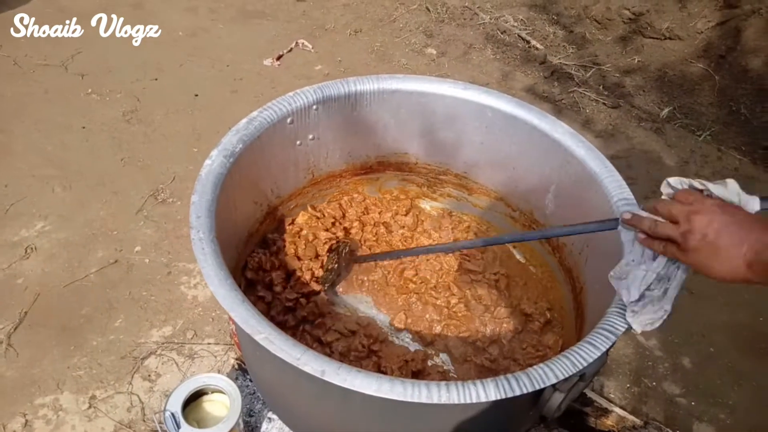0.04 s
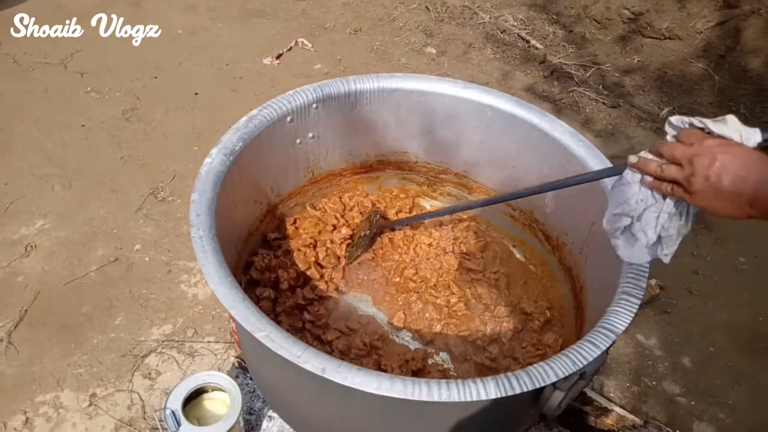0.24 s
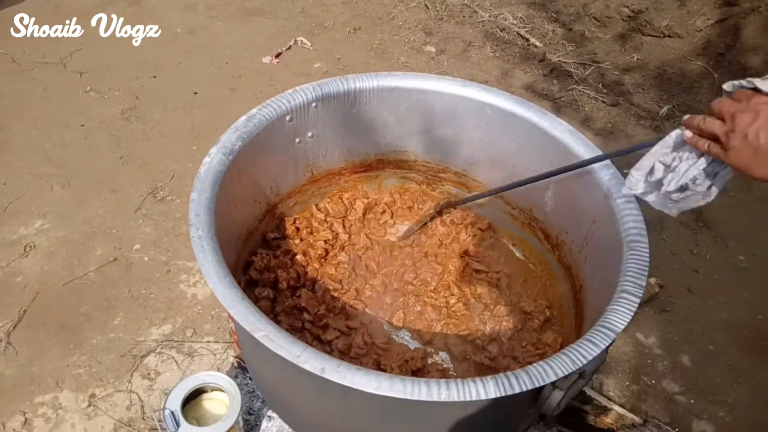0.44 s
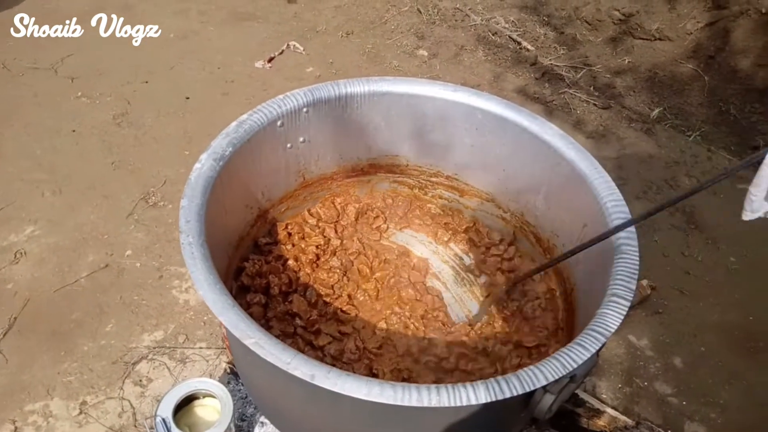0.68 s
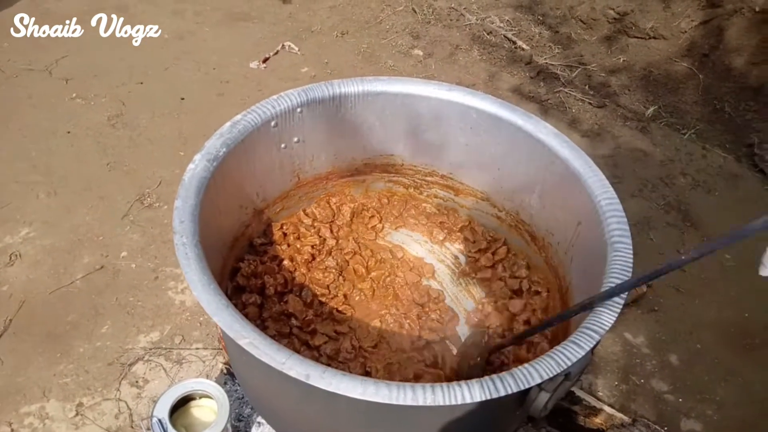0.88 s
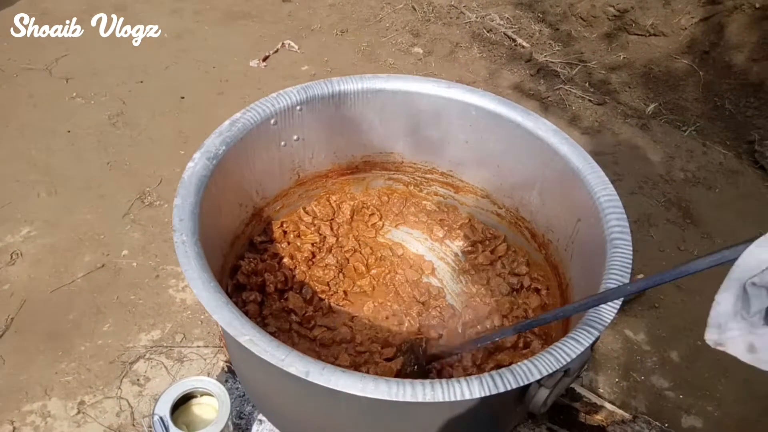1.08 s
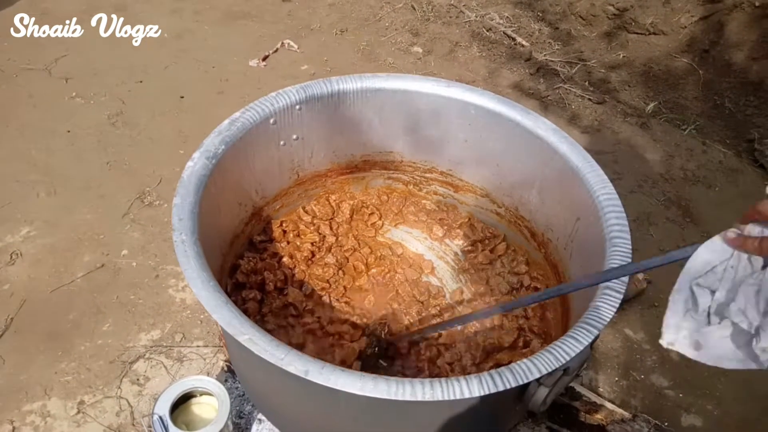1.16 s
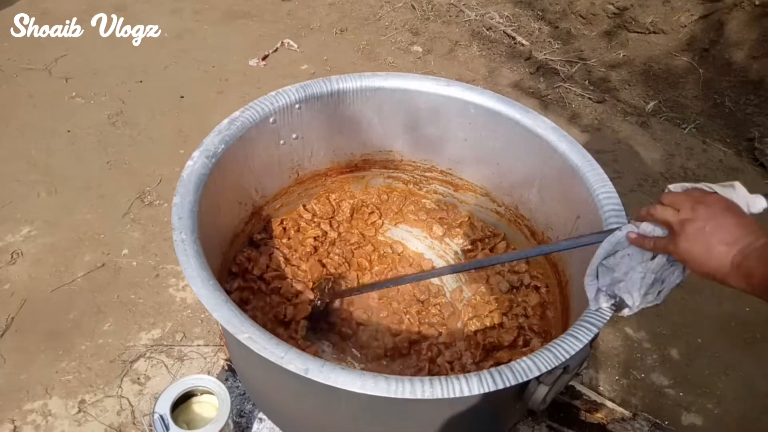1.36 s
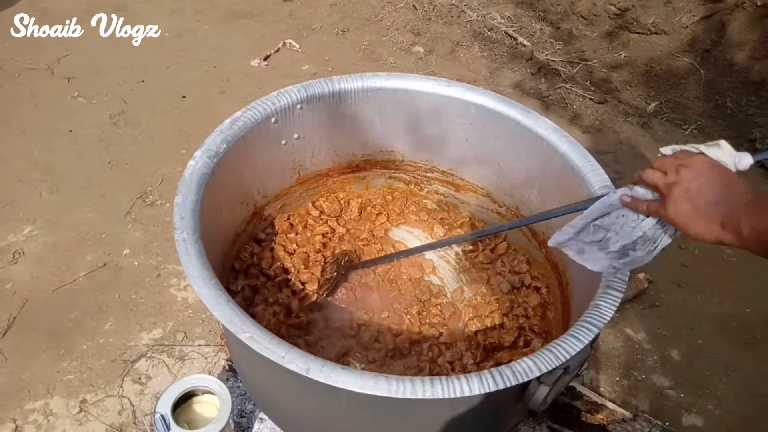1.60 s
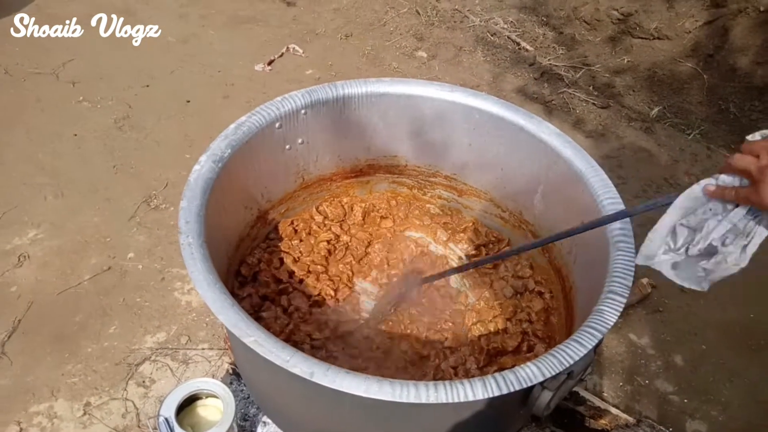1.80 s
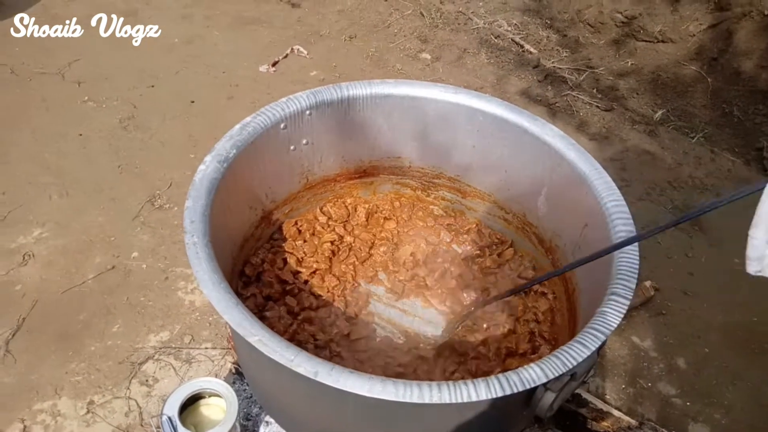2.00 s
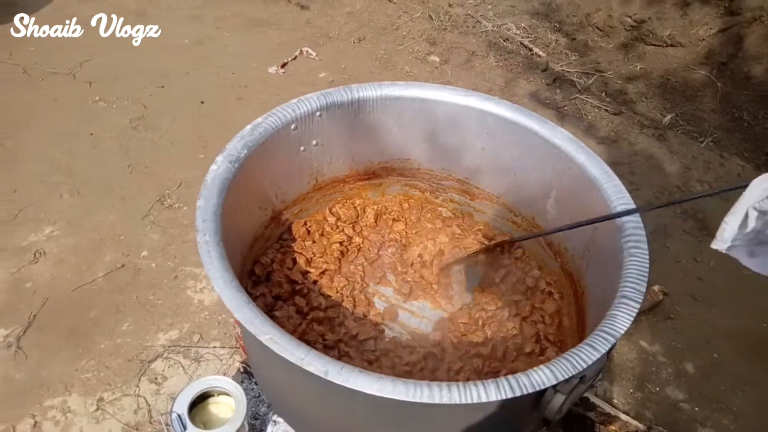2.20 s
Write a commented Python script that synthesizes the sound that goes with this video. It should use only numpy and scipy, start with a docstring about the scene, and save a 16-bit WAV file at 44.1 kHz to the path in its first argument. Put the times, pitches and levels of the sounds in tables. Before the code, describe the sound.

A metal ladle scrapes a big aluminium pot of frying meat. From 0.1 to 0.8 seconds a loud, gritty stroke chirps and squeaks with light knocks. At 0.8-0.97 a rapid clatter makes the pot ring hollowly. Softer scrapes follow at 1.0-1.5 and 1.55-2.0, with ticks, brief squeals and knocks near 1.87. Fat sizzles throughout over faint low booms and meat thuds; close, dry, centred.

```python
"""A long metal ladle stirs meat frying in a big aluminium pot: slips, snaps and chirping grit make the scrape.
Light knocks and short squeals come with the first stroke; then the ladle clatters on the wall and the pot rings.
Two more strokes follow, with squeals, ticks, a few late knocks and one faint low hum of the pot near the end.
Throughout, fat sizzles as noise and tiny pops, louder where hot metal is laid bare,
and the pot's hollow booms softly as lumpy low noise with thuds of shoved meat."""
import sys
import numpy as np
from scipy import signal
from scipy.fft import rfft, irfft
from scipy.io import wavfile
from scipy.ndimage import map_coordinates

SR = 44100
rng = np.random.default_rng(int(sys.argv[2]) if len(sys.argv) > 2 else 0)


def wav_record(signal):
    """Record a signal, one row per channel, as 16-bit PCM in the file named by sys.argv[1]."""
    frames = np.transpose(np.atleast_2d(signal))
    bounded = np.clip(frames, -1, 1)
    # unit amplitude maps onto the largest positive 16-bit level
    quanta = np.round(bounded * 32767).astype(np.int16)
    wavfile.write(sys.argv[1], SR, quanta)


N = 99225
TIME = np.arange(N) / SR

# Three scraping strokes, each a list of: time_s, edge_level_db, wall_level_db, grind_level_db
SCRAPE_STROKES = [
    [(0.12, -51.5, -61, -53), (0.232, -28, -34.5, -42.5), (0.364, -33, -39, -46), (0.432, -27, -40.5, -44),
     (0.48, -33.5, -42, -43.5), (0.553, -29.5, -36.5, -29), (0.624, -39.5, -54, -49),
     (0.688, -45, -52, -43.5), (0.71, -29.5, -31.5, -48), (0.726, -36, -34, -52), (0.774, -51, -50, -63),
     (0.79, -36, -58, -43.5)],
    [(0.99, -32.5, -49, -37), (1.05, -37, -39, -40.5), (1.08, -42, -42.5, -45), (1.144, -38, -37.5, -42),
     (1.226, -33, -32.5, -39), (1.352, -37, -46.5, -39.5), (1.464, -38.5, -39.5, -44),
     (1.49, -43.5, -49, -45), (1.53, -43, -67, -49)],
    [(1.54, -40, -56, -50), (1.594, -44.5, -44, -45), (1.764, -33.5, -41, -44.5),
     (1.892, -29, -35.5, -59.5), (1.974, -29, -42, -41), (1.994, -37, -49, -53), (2.02, -45, -68, -51)],
]
# Spectrum of the ladle's scraping edge: freq_hz, level_db_per_hz
EDGE_SPECTRUM = [(300, -53), (1200, -9), (2400, -1.5), (4000, 3), (5200, -2), (7500, -1), (8800, -7.5),
                 (10200, -14.5), (15000, -21)]
# Spectrum of the rubbed wall: freq_hz, level_db_per_hz
RUB_SPECTRUM = [(100, -54), (500, -10), (1000, -3.5), (1450, 11.5), (1750, -1), (2400, 3), (3500, -23),
                (8000, -26.5)]
# The wall's resonance moves with the point of contact: time_s, resonance_hz
RUB_PITCH_CURVE = [(.2, 1291), (.28, 1527), (.36, 2008), (.44, 1480), (1.3, 1469), (1.8, 1323),
                   (1.949, 1489)]
# Spectrum of the low grind on the loaded bottom: freq_hz, level_db_per_hz
GRIND_SPECTRUM = [(30, -51), (120, -17), (280, -8), (450, -6), (750, 2.5), (1000, -0.5), (1500, 2),
                  (4000, -78.5)]
# Spectrum of a tick of the edge: freq_hz, level_db_per_hz
TICK_SPECTRUM = [(700, -28.5), (3500, -1), (7500, -0.5), (9500, -10), (15000, -18)]
# Modes of the pot, low to high, before the meat's damping: freq_hz, level_db, t60_s
POT_MODES = [(431.5, -8.5, 0.12), (615.7, -3, 0.14), (773, 0.5, 0.16), (806, -5.5, 0.26), (867, -2.5, 0.12),
             (960, -3, 0.16), (1023, -3.5, 0.19), (1098, -8, 0.085), (1168, -1, 0.13), (1232, -2.5, 0.33),
             (1247.5, 2, 0.15), (1365, -8.5, 0.25), (1467, 2, 0.098), (1573, -0.5, 0.23), (1780, -6, 0.11),
             (1960, 2, 0.11)]
# Modes of the ladle: freq_hz, level_db, t60_s
LADLE_MODES = [(2395, 19.5, 0.068), (3160, -19, 0.066), (3480, -8, 0.099), (4200, -2, 0.034),
               (5220, 18, 0.045), (6990, 20, 0.023), (7220, 17, 0.01), (7430, -11, .025)]
# Squeals of the scraping edge, and one faint low hum of the pot near the end:
# start_s, length_s, pitch_hz, level_db
SQUEAL_EVENTS = [(0.226, .028, 6410, -26.5), (.345, 0.22, 3856, -35.5), (.535, 0.06, 2500, -35),
                 (1.31, 0.066, 3570, -36.5), (1.804, 0.028, 1284, -29.5), (1.836, 0.08, 2864, -32),
                 (1.853, .028, 3950, -29), (1.953, 0.03, 2730, -28), (1.994, 0.12, 318, -48)]
# Knocks of the ladle on the pot: start_s, pot_ring_db, ladle_clank_db, spot_pitch_hz
KNOCK_EVENTS = [(0, -34, -40, 1257), (0.42, -27, -28.5, 1970), (.542, -39, -26.5, 790),
                (0.7, -34, -31, 1500), (0.795, -40.5, -34, 1346), (.8195, -14.5, -36, 1250),
                (0.8232, -13, -15.5, 831), (0.8264, -15, -32, 976), (0.841, -16, -19.5, 1218),
                (.857, -17.5, -29, 712), (0.867, -14, -21, 1586), (.883, -16.5, -23, 1090),
                (.887, -18.5, -22, 656), (0.9182, -17, -14, 817), (.9255, -14, -37, 1296),
                (.936, -26, -47, 1380), (0.9523, -12.5, -16, 1311), (.984, -38, -24.5, 1400),
                (1.043, -41, -33, 1430), (1.853, -42, -24, 1430), (1.885, -32, -31, 1260)]
# Sharp ticks where the ladle's edge catches: start_s, level_db
TICK_EVENTS = [(0.4659, -22.5), (0.823, -18), (0.8433, -28), (.92, -29), (0.954, -28), (1.243, -26.5),
               (1.258, -29), (1.3, -25), (2.0734, -30), (2.135, -29)]
# Spectrum of the ladle's contact noise in a knock: freq_hz, level_db_per_hz
CLANK_SPECTRUM = [(30, -44), (400, -8), (1200, 0.5), (3000, 6.5), (5500, 5), (7500, 4), (9000, -7),
                  (11000, -20), (15500, -31)]
# Spectrum of the dense ring of the struck wall: freq_hz, level_db_per_hz
WALL_SPECTRUM = [(40, -45), (150, -27), (300, -11), (450, -5.5), (800, -10), (1400, 2.5), (2000, -4),
                 (2600, -10.5), (4000, -5.5), (9000, -49)]
# Spectrum of the sizzling fat: freq_hz, level_db_per_hz
SIZZLE_SPECTRUM = [(30, -41), (200, -4.5), (600, -7), (1400, -5.5), (2300, -12.5), (3600, 3), (5000, -0.5),
                   (5900, -2), (7400, 1.5), (8600, -5.5), (10000, -10.5), (14000, -12.5), (15700, -24)]
# Spectrum of spitting fat: freq_hz, level_db_per_hz
SPIT_SPECTRUM = [(2000, -23), (5000, -3), (8000, -20), (13500, 11), (15700, -11)]
# Level of the sizzle: time_s, level_db
SIZZLE_LEVEL = [(.11, -40), (.4, -34), (.64, -35.5), (.73, -35), (.8, -35), (.89, -52), (1.1, -38.5),
                (1.25, -36), (1.52, -40), (1.75, -34), (2.03, -36), (2.15, -34.5), (2.25, -35)]
# Spectrum of the pot's hollow: freq_hz, level_db_per_hz
BOOM_SPECTRUM = [(20, -34), (50, -44), (80, -10.5), (110, -10.5), (150, -0.5), (185, 5), (230, 0.5),
                 (300, -13.5), (500, -21.5), (1500, -46)]
# Level of the hollow boom: time_s, level_db
BOOM_LEVEL = [(.1, -50.5), (.55, -45), (.95, -46), (1.3, -44), (1.55, -52), (1.8, -46.5), (2.0, -48.5),
              (2.25, -52.5)]
# Dull thuds of meat shoved against the pot: start_s, level_db, pitch_hz
THUD_EVENTS = [(0, -34, 169), (0.372, -33.5, 194), (0.57, -33, 187), (0.651, -34, 156), (0.688, -32.5, 189),
               (.821, -28, 176), (0.873, -36, 208), (.919, -29.5, 164), (1.099, -36.5, 175),
               (1.717, -38, 192), (1.792, -31.5, 190), (1.82, -37, 195), (1.888, -34, 176),
               (2.088, -38, 179)]

SLIPS_PER_S, SNAPS_PER_S = 2500, 70
GRIT_SHARE, LADLE_SHARE, CRUST_SHARE = 0.62, 0.14, 0.15  # shares of power in each blend
CHIRPS_PER_S, CHIRP_RISE_S, CHIRP_SPREAD_DB = 1400, 0.0042, 13
CHIRP_LOW_HZ, CHIRP_SPAN_HZ = 1173.6, 9030
TICK_RISE_S = 0.0012
SQUEAL_WIDTH = 0.0095  # pitch wander, as a share of the pitch
RING_RISE_S, RING_T60_S, RING_SPREAD_OCT, RING_MODE_SHARE = 0.0045, 0.12, 0.75, 0.66
MEAT_DAMPING_S = 0.12  # extra decay of the pot's modes, to 1/e
SPOT_SHARE, SPOT_T60_S = 0.36, 0.07
FLUTTER_S, FLUTTER_DEPTH = 0.00586, 0.35  # bending waves circle the wall and return
CLANK_RISE_S, CLANK_FALL_S, CLANK_TAIL_DB, CLANK_TAIL_S = 0.0032, 0.0067, -12, 0.011
POPS_PER_S, SPITS_PER_S, SPIT_DB = 1500, 1200, -28.5  # spit level is relative to the frying fat
LUMP_DB, LUMPS_HZ = 2.1, 18
THUD_RISE_S = 0.0071
CUTOFF_HZ = 15600


def amp(db):
    """Decibels to gain."""
    return 10 ** (np.asarray(db) / 20)


def unit(x):
    """Scales to rms 1."""
    return x / np.sqrt(np.mean(x ** 2) + 1e-20)


def decay(t, t60):
    """Exponential fall of 60 dB in t60 seconds."""
    return np.exp(-np.log(1000) * t / t60)


def add(mix, start_s, sound):
    """Mixes a sound in at a time, cut off where the mix ends."""
    part = mix[round(start_s * SR):][:len(sound)]
    part += sound[:len(part)]


def blend(a, b, share):
    """Equal-power mix with the given share of b."""
    share = np.clip(share, 0, 1)
    return np.sqrt(1 - share) * a + np.sqrt(share) * b


def colour(x, points):
    """Shapes a sound with a minimum-phase filter of the given spectrum; rms 1."""
    size = 4096
    hz, db = np.transpose(points)
    log_hz = np.log(abs(np.fft.fftfreq(size, 1 / SR)) + 1)
    log_gain = np.log(amp(np.interp(log_hz, np.log(hz), db)))
    # the Hilbert transform of the log gain supplies the phase
    taps = np.fft.ifft(np.exp(np.conj(signal.hilbert(log_gain)))).real
    return unit(irfft(rfft(x) * rfft(taps, len(x)), len(x)))


def wobble(hz):
    """Slow random drift, mostly below the given rate; rms 1."""
    freqs = np.fft.rfftfreq(N, 1 / SR)
    return unit(irfft(rfft(rng.standard_normal(N)) / (1 + (freqs / hz) ** 2), N))


def clicks(per_s, spread_db):
    """Random clicks; a positive spread makes a few much louder than the rest, a negative one softer."""
    size = amp(spread_db * np.minimum(rng.exponential(1, N), 5))
    happens = rng.random(N) < per_s / SR
    return unit(size * rng.choice([-1, 1], N) * happens)


def ring(x, modes):
    """Drives a set of decaying modes with a sound; rms 1."""
    t = np.arange(SR // 2) / SR
    response = sum(amp(db) * decay(t, t60) / np.sqrt(t60) * np.cos(2 * np.pi * hz * t)
                   for hz, db, t60 in modes)
    return unit(signal.fftconvolve(x, response)[:len(x)])


def scraping():
    """Clumped tiny slips excite the ladle, wall and loaded bottom; crust snaps scatter evenly among them."""
    slips = clicks(SLIPS_PER_S, spread_db=-2.0) * amp(3.6 * wobble(hz=68.5))
    rubs = clicks(SLIPS_PER_S, spread_db=1.5) * amp(1.47 * wobble(hz=49.7))
    grit = blend(slips, chirps(), GRIT_SHARE)
    edge = blend(colour(grit, EDGE_SPECTRUM), ring(slips, LADLE_MODES), LADLE_SHARE)
    edge = blend(edge, crust(), CRUST_SHARE)
    rubbed_wall = bend(colour(rubs, RUB_SPECTRUM), RUB_PITCH_CURVE)
    wall = blend(rubbed_wall, ring(rubs, POT_MODES[6:]), share=0.28)
    grind = blend(colour(rubs, GRIND_SPECTRUM), ring(rubs, POT_MODES[:6]), share=0.21)

    s, edge_db, wall_db, grind_db = np.vstack(SCRAPE_STROKES).T
    parts = [(edge, edge_db), (wall, wall_db), (grind, grind_db)]
    # silent before the first stroke and after the last
    return sum(x * amp(np.interp(TIME, s, db, left=-np.inf, right=-np.inf)) for x, db in parts)


def chirps():
    """Grit caught under the edge rings for a moment, each grain at its own pitch; rms 1."""
    t = np.arange(2048) / SR
    out = np.zeros(N)
    swell = t / CHIRP_RISE_S * np.exp(-t / CHIRP_RISE_S)
    for when, pitch, size, phase in rng.random((int(CHIRPS_PER_S * N / SR), 4)):
        hz = CHIRP_LOW_HZ + CHIRP_SPAN_HZ * pitch
        gain = amp(CHIRP_SPREAD_DB * size ** 3)  # the cube keeps loud grains rare
        add(out, when * TIME[-1], gain * swell * np.sin(2 * np.pi * (hz * t + phase)))
    return unit(out)


def crust():
    """Snaps of crust: ticks of random size, scattered evenly at random; rms 1."""
    out = np.zeros(N)
    for when, size in rng.random((int(SNAPS_PER_S * N / SR), 2)):
        add(out, when * TIME[-1], size * tick())
    return unit(out)


def tick():
    """One dry, bright snap: coloured noise that rises fast and dies; about rms 1 at its peak."""
    t = np.arange(SR // 16) / SR
    noise = colour(rng.standard_normal(len(t)), TICK_SPECTRUM)
    return noise * t / TICK_RISE_S * np.exp(1 - t / TICK_RISE_S)


def bend(x, points):
    """Moves the main resonance of a rubbed sound along a pitch curve by varying its playing speed."""
    resonance_hz = max(RUB_SPECTRUM, key=lambda point: point[1])[0]
    place = np.cumsum(np.interp(TIME, *np.transpose(points)) / resonance_hz)
    return map_coordinates(x, [place], mode="grid-wrap")


def squeals():
    """Squeals of the edge and one faint low hum of the pot: short, unsteady tones that swell and die."""
    out = np.zeros(N)
    for s, length, hz, db in SQUEAL_EVENTS:
        t = np.arange(0, length, 1 / SR)
        pitch = hz * (1 + SQUEAL_WIDTH * wobble(hz=150)[:len(t)])
        swell = np.sin(np.pi * t / length) * amp(db + 3.1 * wobble(hz=90)[:len(t)])
        add(out, s, swell * np.sin(2 * np.pi * np.cumsum(pitch) / SR))
    return out


def clatter():
    """All knocks and separate ticks of the ladle on the pot."""
    out = np.zeros(N)
    for s, ring_db, clank_db, spot_hz in KNOCK_EVENTS:
        add(out, s, amp(ring_db) * pot_ring(spot_hz) + amp(clank_db) * ladle_clank())
    for s, db in TICK_EVENTS:
        add(out, s, amp(db) * tick())
    return out


def pot_ring(spot_hz):
    """The struck spot bongs and the whole pot flutters and rings, favouring modes near the spot's pitch."""
    t = np.arange(SR // 2) / SR
    hz, db, t60 = np.transpose(POT_MODES)[:, :, None]
    weight = amp(db) * np.exp(-0.5 * (np.log2(hz / spot_hz) / RING_SPREAD_OCT) ** 2)
    fall = decay(t, t60) * np.exp(-t / MEAT_DAMPING_S)
    modes = weight * fall * np.sin(2 * np.pi * (hz * t + rng.random(hz.shape)))
    modes = modes.sum(0) * np.sqrt(2) / np.linalg.norm(weight)
    dense = colour(rng.standard_normal(len(t)), WALL_SPECTRUM) * decay(t, RING_T60_S)
    spot = np.sqrt(2) * np.sin(2 * np.pi * spot_hz * t) * decay(t, SPOT_T60_S)
    body = blend(blend(dense, modes, RING_MODE_SHARE), spot, SPOT_SHARE)
    flutter = 1 + FLUTTER_DEPTH * np.cos(2 * np.pi * t / FLUTTER_S)
    return body * np.minimum(t / RING_RISE_S, 1) * flutter


def ladle_clank():
    """A short bright burst of contact noise with a softer tail of the ladle's own modes."""
    t = np.arange(SR // 2) / SR
    after = np.maximum(t - CLANK_RISE_S, 0)
    contact = colour(rng.standard_normal(len(t)), CLANK_SPECTRUM)
    tail = blend(contact, ring(rng.standard_normal(len(t)), LADLE_MODES), share=0.9)
    clank = contact * np.exp(-after / CLANK_FALL_S)
    clank += amp(CLANK_TAIL_DB) * tail * np.exp(-after / CLANK_TAIL_S)
    return np.minimum(t / CLANK_RISE_S, 1) * clank


def sizzle():
    """Bursting droplets of fat over a fine hiss of steam, with irregular bright spurts."""
    fat = blend(rng.standard_normal(N), clicks(POPS_PER_S, spread_db=-0.5), share=0.3)
    spit = colour(clicks(SPITS_PER_S, spread_db=-2.5), SPIT_SPECTRUM)
    spit *= amp(SPIT_DB + 3.1 * wobble(hz=27))
    level_db = np.interp(TIME, *np.transpose(SIZZLE_LEVEL)) + 0.84 * wobble(hz=30)
    return (colour(fat, SIZZLE_SPECTRUM) + spit) * amp(level_db)


def boom():
    """The hollow of the pot rumbles in loose lumps and thuds as the meat is shoved about."""
    lumps = unit(amp(LUMP_DB * wobble(hz=LUMPS_HZ)))
    level = amp(np.interp(TIME, *np.transpose(BOOM_LEVEL)))
    out = colour(rng.standard_normal(N), BOOM_SPECTRUM) * lumps * level
    t = np.arange(SR // 8) / SR
    swell = (t / THUD_RISE_S * np.exp(1 - t / THUD_RISE_S)) ** 2
    for s, db, hz in THUD_EVENTS:
        add(out, s, amp(db) * swell * np.sin(2 * np.pi * hz * t))
    return out


def scene():
    """Everything comes from the pot, straight ahead: the same sound in both channels."""
    mix = scraping() + squeals() + clatter() + sizzle() + boom()
    return np.tile(mix, (2, 1))


def record(dry):
    """A steep low-pass sets the upper band limit."""
    taps = signal.firwin(511, CUTOFF_HZ, window=("kaiser", 9), fs=SR)
    return signal.oaconvolve(dry, taps[None], "same")


dry = scene()
out = record(dry)
wav_record(out)
```